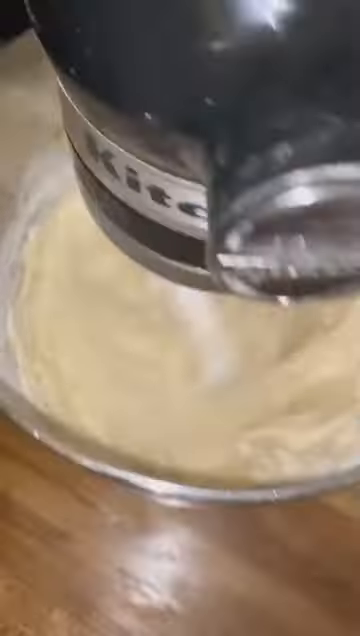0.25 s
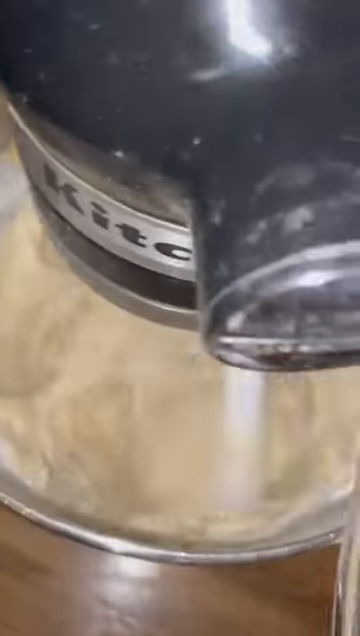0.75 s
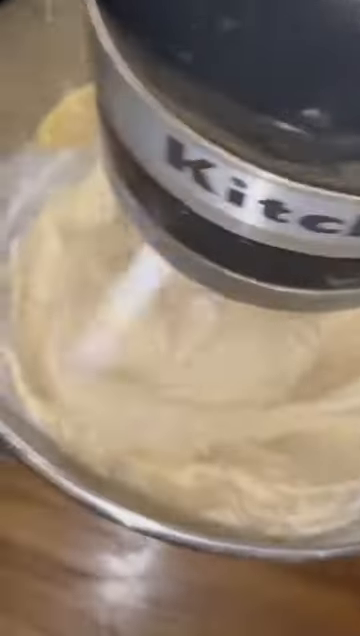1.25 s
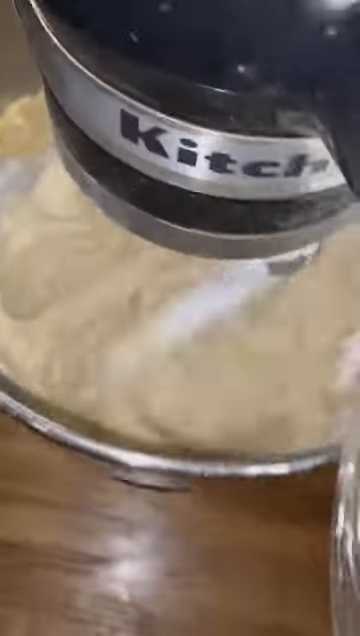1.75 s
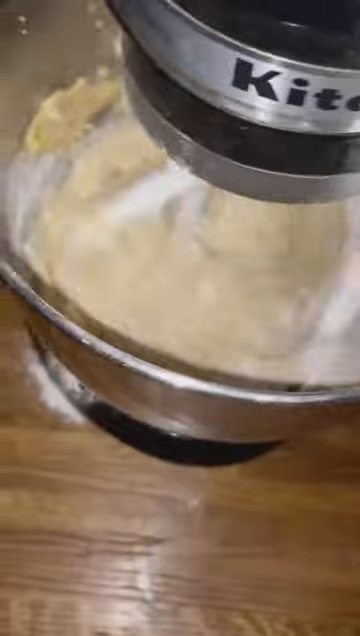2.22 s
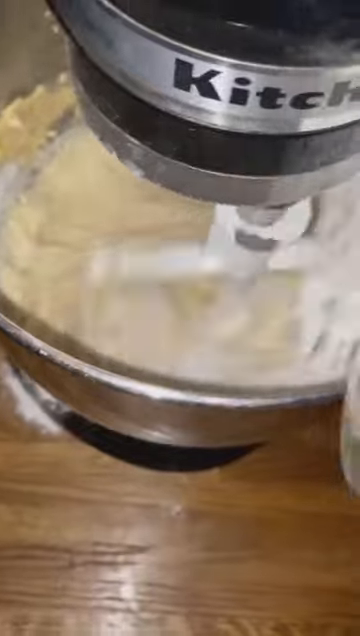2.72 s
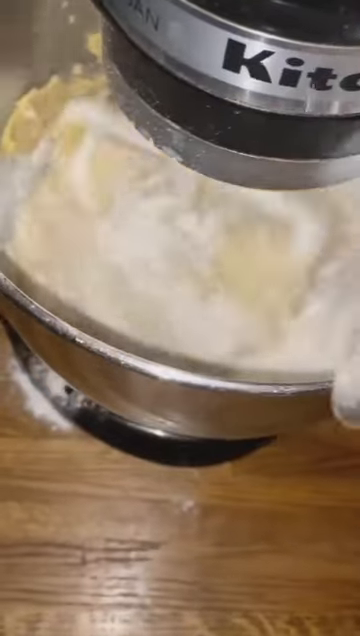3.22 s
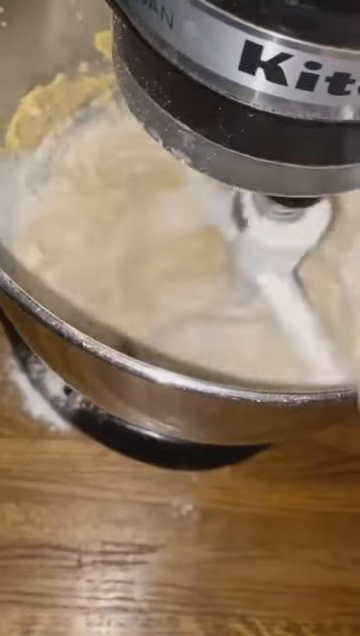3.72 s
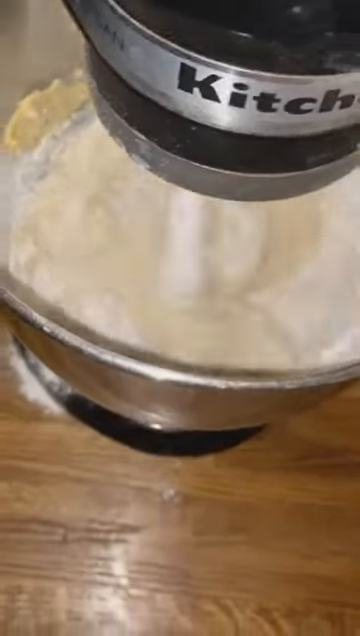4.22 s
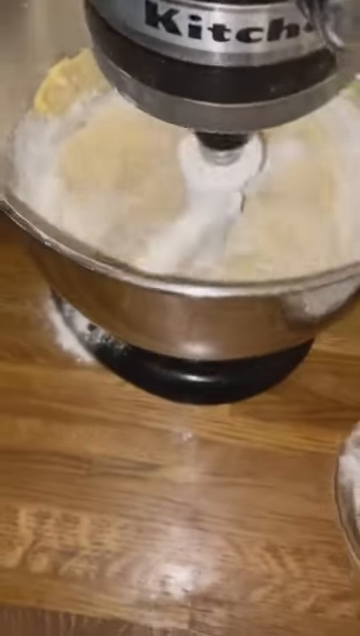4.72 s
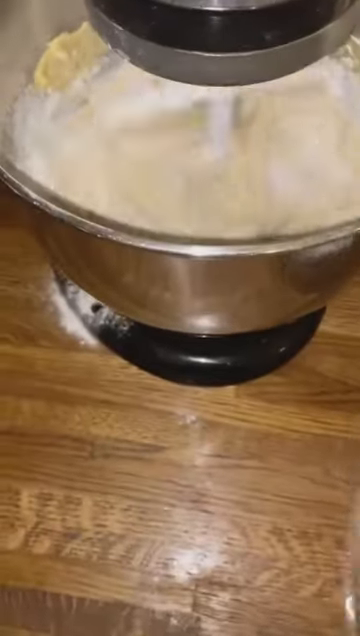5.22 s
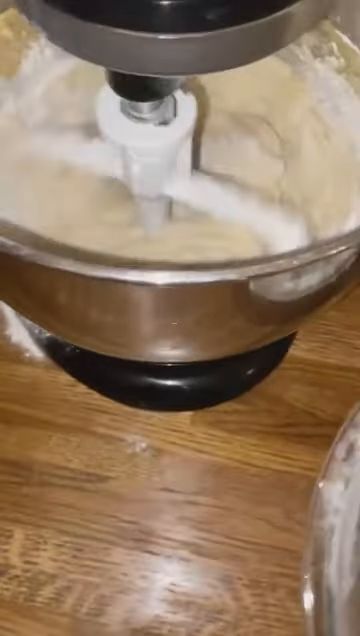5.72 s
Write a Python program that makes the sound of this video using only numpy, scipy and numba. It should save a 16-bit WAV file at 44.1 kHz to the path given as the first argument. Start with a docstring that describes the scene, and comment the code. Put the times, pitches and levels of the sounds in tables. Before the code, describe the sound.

A stand mixer works thick batter at a steady speed for about six seconds, recorded very close by phone in a lightly reverberant kitchen. The motor gives a buzzing hum with wavering whines, over a coarse whirr of gears and brushes with tiny random ticks. It grows louder during the first second as the phone leans in, then recedes after about 3.8 s. A low, soft counter bump falls at 0.66 s. From 1.47 to 3.6 s, about ten irregular taps of a dish on the steel rim clack loudly, with quick bounces, short damped rings and low thumps; they generally brighten as it empties, with one very faint tap near 3.47 s. The loudest blows briefly duck the motor. At 4.8 to 5.4 s the dish knocks on the wooden counter with falling chirps, rattle and a short low judder near 5.1 s. Faint sticky smacks occur throughout.

```python
"""A wooden counter in a kitchen: a stand mixer beats thick batter, the phone held just above the steel bowl.
The motor hums and whines in ladders of tones one torque pulse apart, over a noisy whirr of gears and
brushes, louder as the phone leans in. A dish of flour is tapped empty on the rim, ringing bowl and dish,
then set down and nudged along the counter, which answers with falling chirps and a low judder.
Sticky smacks and a faint room tail lie behind; the phone's limiter ducks around the loudest blows."""
import sys
import numpy as np
from scipy import signal
from scipy.fft import rfft, irfft
from scipy.io import wavfile
from scipy.ndimage import uniform_filter1d, minimum_filter1d
from numba import njit

SR = 44100
rng = np.random.default_rng(int(sys.argv[2]) if len(sys.argv) > 2 else 0)


def unload_audio(sound):
    """Save the sound as a 16-bit wav file, at the path given as the first command line argument."""
    columns = np.transpose(np.atleast_2d(sound))
    # keep every value between -1 and 1, then stretch to whole-number steps
    steps = np.round(np.clip(columns, -1, 1) * 32767)
    wavfile.write(sys.argv[1], SR, steps.astype(np.int16))


N = 262836
T, FREQ = np.arange(N) / SR, np.maximum(np.fft.rfftfreq(N, 1 / SR), 1)

# torque pulses (two a mains cycle), rotor turns, and the lowest lines of the growl, gear and whine ladders
PULSE_HZ, ROTOR_HZ = 119.9, 74.4
GROWL_HZ, GEAR_HZ, WHINE_HZ = 137.4, 821.7, 761.9
# dB lost per doubling of distance; the counter carries the lows, so they fall off less
HUM_FALL_DB, WHINE_FALL_DB, RUMBLE_FALL_DB, GEAR_FALL_DB, HISS_FALL_DB = 4, 5, 4, 5, 4.5


def undb(db):
    """Decibels to gain."""
    return 10 ** (np.asarray(db) / 20)


def over_hz(points):
    """Join (Hz, value) points on a log-frequency axis."""
    hz, value = np.transpose(points)
    return np.interp(np.log(FREQ), np.log(hz), value)


def filtered(x, gain):
    """Apply a frequency response."""
    return irfft(rfft(x) * gain, N)


def unit(x):
    """Scale to rms 1."""
    return x / np.sqrt(np.mean(x ** 2))


def walk(rate):
    """Smooth chance, changing about rate times a second, rms 1."""
    return unit(filtered(rng.standard_normal(N), np.exp(-(FREQ / rate) ** 2)))


def fade(t, t60):
    """Exponential decay, 60 dB down after t60 seconds."""
    return np.exp(-np.log(1000) * t / t60)


def resonance(hz, width_hz):
    """Resonant peak of gain 1 at hz, half as high at the edges of its width."""
    return 1 / (1 + (2 * (FREQ - hz) / width_hz) ** 2)


def add(track, s, sound):
    """Mix a sound into a track at time s."""
    start = int(s * SR)
    track[..., start:start + sound.shape[-1]] += sound[..., :N - start]


def motor(tone_db=-3.0, waver_db=1.57, drift_hz=1.0, flutter_db=1.5, own_db=1.65, own_drift_hz=0.53):
    """Ladders of hum and whine; the batter's drag makes each ladder waver, and each line a little on its own."""
    # Tone ladders, lines PULSE_HZ apart. Each row: lowest line in Hz, list of relative dB of each line upwards.
    ladders = [(PULSE_HZ, [-37.5, -42.5, -61, -54.5, -48]), (ROTOR_HZ, [-58, -39, -40.5, -51, -60]),
               (PULSE_HZ - ROTOR_HZ, [-52, -41.5, -75, -56.5]), (2 * ROTOR_HZ, [-40.5, -49.5]),
               (2 * (PULSE_HZ - ROTOR_HZ), [-70, -74, -43, -47.5]), (GROWL_HZ, [-41.5, -62, -44]),
               (GEAR_HZ, [-77, -43.5]), (WHINE_HZ, [-46, -60, -47, -46.5, -43, -56.5])]
    quarter_cycle = np.array([[0], [1 / 4]])  # the side is a quarter cycle ahead of the mid
    out = np.zeros((2, N))
    for lowest, line_dbs in ladders:
        near_db = nearness(HUM_FALL_DB if lowest < 2 * PULSE_HZ else WHINE_FALL_DB)
        # drift_hz is the rms drift of a ladder that starts at 500 Hz
        drift = drift_hz * np.sqrt(lowest / 500) * np.cumsum(walk(7.4)) / SR
        ladder_db = tone_db + near_db + waver_db * walk(2.0) + flutter_db * walk(39)
        strength = np.sqrt(2) * undb(ladder_db)
        for k, db in enumerate(line_dbs):
            wobble = walk(9.2)
            own_drift = own_drift_hz * np.cumsum(wobble) / SR
            cycles = (lowest + k * PULSE_HZ) * T + drift + own_drift + rng.random() + quarter_cycle
            out += undb(db + own_db * wobble) * strength * np.sin(2 * np.pi * cycles)
    return out


def nearness(fall_db, reference_m=0.3):
    """Level in dB of a part of the mixer as the phone moves nearer and farther."""
    # The phone leans in over the bowl, then draws back. Each row: time in seconds, distance to the motor in m.
    distance = [(0, 0.3), (.85, 0.21), (2.5, 0.22), (3.8, 0.26), (4.55, 0.38), (5.96, 0.34)]
    return -fall_db * np.log2(np.interp(T, *np.transpose(distance)) / reference_m)


def whirr(rumble_db=-36, gear_db=-39.0, hiss_db=-43, pulse_depth=0.025, beat_depth=0.21, rotor_depth=0.013,
          grain_db=2, churn_db=1.0, repeat=0.19, tick_rate=30, tick_db=3.0, tick_t60=0.028):
    """Gear teeth and brushes chatter in the housing, surging with torque pulse, rotor and the beat of both."""
    pulse = 2 * np.pi * PULSE_HZ * T
    rotor = 2 * np.pi * (ROTOR_HZ * T + np.cumsum(walk(4.1)) / SR / 2)
    pulsing = pulse_depth * (np.cos(pulse) + np.cos(3 * pulse) / 2)
    surge = pulsing + beat_depth * np.cos(pulse - rotor) + rotor_depth * np.cos(rotor)  # log gain
    # slack in the gears lets the teeth tick at random, about tick_rate times a second
    strikes = (rng.random(N) < tick_rate / SR) * rng.random(N)
    ticks = undb(tick_db) * filtered(strikes, rfft(fade(T, tick_t60)))
    chatter = rng.standard_normal((2, N)) * np.exp(surge) * undb(grain_db * walk(390))
    brushes = rng.standard_normal((2, N)) * np.exp(surge / 2)
    # three bands, crossing at 650 and 2450 Hz
    below_gears, below_hiss = 1 / (1 + (FREQ / 650) ** 6), 1 / (1 + (FREQ / 2450) ** 6)
    parts = [(chatter * (1 + ticks / 2), below_gears, rumble_db + nearness(RUMBLE_FALL_DB)),
             (chatter * (1 + ticks), below_hiss - below_gears, gear_db + nearness(GEAR_FALL_DB)),
             (brushes * (1 + ticks / 2), 1 - below_hiss, hiss_db + nearness(HISS_FALL_DB))]
    # the same teeth meet on every turn, so part of the chatter repeats
    turns = 1 / (1 - min(repeat, .9) * np.exp(-2j * np.pi * FREQ / ROTOR_HZ))
    out = 0
    for source, band, db in parts:
        out = out + unit(housing(source, band * turns)) * undb(db + churn_db * walk(21))
    return shifting(out)


def housing(x, band, stiff_s=3.4, stiffen_s=4.8):
    """The housing colours one band, its resonances shifting in strength as the flour stiffens the batter."""
    # Colour of the whirr. Each row: frequency in Hz, relative level in dB per Hz.
    whirr_colour = [(30, -33), (48, -49), (75, 3.5), (150, -1.5), (350, -2), (560, -10.5), (1300, -22.5),
                    (1520, -19.5), (2400, -15.5), (4000, -19.5), (5400, -21.5), (5900, -20), (7700, -23),
                    (8300, -26.5), (13000, -29), (16000, -35)]
    # Housing resonances. Each row: centre in Hz, width in Hz, dB in thin batter, dB in stiff batter.
    housing_modes = [(471, 52, 6, -12), (862, 274, 15, 18), (1258, 290, 14.5, 12.5), (1668, 86, 6, 1),
                     (1770, 46, 0, 7.5), (1914, 88, 4.5, 5.5), (1800, 1320, 7, 7.5), (2163, 79, 5.5, 5.5),
                     (2905, 340, 4, 6), (3960, 230, 1.5, 2)]
    hz, width_hz, thin_db, stiff_db = np.transpose(housing_modes)[:, :, None]
    peaks, colour_db = resonance(hz, width_hz), over_hz(whirr_colour)
    thin = filtered(x, band * undb(colour_db + np.sum(thin_db * peaks, axis=0)))
    stiff = filtered(x, band * undb(colour_db + np.sum(stiff_db * peaks, axis=0)))
    # the change takes stiffen_s and is half done at stiff_s
    return thin + (stiff - thin) * np.clip(.5 + (T - stiff_s) / stiffen_s, 0, 1)


def shifting(x, shift_db=1.03, shift_rate=1.3, count=14):
    """The colour drifts: each half octave from 150 Hz up swells and sinks on its own."""
    place = np.clip(2 * np.log2(FREQ / 150), 0, count - 1)
    spectrum = rfft(x)
    out = 0
    for k in range(count):
        band = irfft(spectrum * np.maximum(1 - abs(place - k), 0), N)
        out = out + band * undb(shift_db * walk(shift_rate))
    return out


def rim_taps(tap_db=-2, rim_db=2, crack_db=-9.5, contact_s=0.0067, tail_db=-10, tail_t60=0.085, spot_db=5.0,
             lag_s=0.002802, side_db=1.0, sharpness=6, rock_s=0.0079, attack_s=0.0034, lift_s=0.013,
             detune=0.0056, zing_db=-17, zing_lag_s=0.018, zing_hz=3000, count=3, bounce_s=0.0033,
             bounce_db=-3.6, half_empty_s=2.69, bright_per_s=0.32, bright_per_db=0.1527,
             clack_db=-1.5, clack_t60=0.038, dish_hz=3850, dish_octaves=0.17, dish_db_per_s=3.3):
    """Each tap bounces on the rim, ringing dish and batter-damped bowl anew; the mixer rocks on its base."""
    # Taps of the dish. Each row: start in seconds, level in dB, pitch of the clack in Hz (it depends on how the
    # dish is held), Hz favoured by the spot struck, dB of the rim's lowest ring, dB of the zing round the wall.
    taps = [(1.4662, 0, 1977, 2930, -3.5, 3.5), (1.6936, -5, 1906, 2830, -7, -8),
            (2.1087, -9, 1805, 1057, -4, 1), (2.271, 0, 1770, 1049, -26, -15),
            (2.487, -2, 1800, 2620, 5.5, -10), (2.6685, 0, 1823, 2530, 1, 7),
            (2.8652, -0.5, 1845, 3840, 10.5, 10), (3.2537, -3.5, 1770, 2130, -6, 9.5),
            (3.465, -22, 1800, 1700, 9.5, -6), (3.5996, -2.5, 1900, 2470, 0.5, 12)]
    # Modes of, in turn, the loaded bowl, the longer-ringing bare rim (lowest first), the dish's short high
    # pair and the mixer rocking on its base. Each row: frequency in Hz, relative level in dB, t60 in seconds.
    bowl = [(230, -6, 0.034), (303, -13, 0.13), (433, -16.5, 0.083), (618, -9.5, 0.06), (950, -9.5, 0.019),
            (1029, -4, 0.035), (2138, -9.5, 0.052), (2567, -8, 0.064), (2790, -11, 0.045),
            (2892, -1.5, 0.023), (3230, -21, 0.017), (3510, -12, 0.018), (4870, -19, 0.027),
            (5390, -21.5, 0.06), (6270, -24, 0.025)]
    rim_modes = [(1633, -9.5, 0.095), (2777, -23, 0.2), (4540, -26, 0.07)]
    dish = [(3830, -3.5, 0.022), (3945, -3, 0.02)]
    base = [(75.7, -9, 0.21), (108.5, -4, 0.083)]
    # Crack of the contact. Each row: frequency in Hz, relative level in dB per Hz.
    crack_colour = [(40, -27), (150, -5), (1200, -5), (1900, 0), (2800, 0), (3300, -2), (3900, -1),
                    (4200, -9), (5500, -8), (6500, -13), (8000, -10), (12000, -17), (16000, -27)]
    rings, cracks, zings, t = np.zeros((2, N)), np.zeros((2, N)), np.zeros((2, N)), T[:SR // 3]
    thump = sum(undb(db) * np.sin(2 * np.pi * f * t) * fade(t, ring_s) for f, db, ring_s in base)
    thump = thump * (1 - np.exp(-(t / rock_s) ** 2))  # the heavy mixer is slow to start rocking
    attack, touch = 1 - fade(t, attack_s), np.exp(-(t / contact_s) ** 2)
    contact = attack * (touch + undb(tail_db) * fade(t, tail_t60))
    lift = 1 - np.exp(-(t / lift_s) ** 2)  # the rim sings only as the dish lifts off it
    rim_hz, rim_mode_db, rim_t60 = np.transpose(rim_modes)
    for s, db, clack_hz, spot_hz, lowest_db, wall_db in taps:
        hz, mode_db, t60 = np.transpose([(clack_hz, clack_db, clack_t60)] + dish + bowl)
        # taps are brighter as the dish empties and when they are harder; tilt in dB per octave
        bright = bright_per_s * (s - half_empty_s) + bright_per_db * db
        # flour damps the dish's high ring, less as it empties
        emptying = dish_db_per_s * (s - half_empty_s) * favour(hz, dish_hz, octaves=dish_octaves)
        tilt = bright * np.log2(hz / 1000)
        mode_db = mode_db + tap_db + emptying + spot_db * favour(hz, spot_hz) + tilt
        rim = ringing(t, rim_hz, rim_db + rim_mode_db + lowest_db * (rim_hz == rim_hz[0]), rim_t60)
        add(rings, s, undb(db) * (lift * rim + thump))
        add(zings, s, undb(db + wall_db) * touch * rng.standard_normal((2, len(t))))
        for k in range(count):
            when = s + k * bounce_s * rng.uniform(0.65, 1.3)
            strength = undb(db + k * bounce_db)
            # the dish's pressure pulls each mode a little
            pressed_hz = hz * (1 + detune * rng.standard_normal(len(hz)))
            add(rings, when, strength * attack * ringing(t, pressed_hz, mode_db, t60))
            noise = rng.standard_normal((2, len(t)))
            add(cracks, when, strength * undb(sharpness * bright) * contact * noise)
    # the treble of the contact runs round the steel wall and returns as a falling zing
    zings = filtered(bending(zings, zing_lag_s), 1 / np.hypot(1, (zing_hz / FREQ) ** 2))
    contact_noise = undb(crack_db) * cracks + undb(zing_db) * zings
    blows = rings + filtered(contact_noise, unit(undb(over_hz(crack_colour))))
    # start earlier by half the 1 kHz travel time
    return np.roll(bending(blows, lag_s), -int(lag_s / 2 * SR), axis=1) * undb([[0], [side_db]])


def favour(hz, spot_hz, octaves=0.03):
    """How fully a blow on one spot excites a mode, 0-1."""
    return np.exp(-(np.log2(hz / spot_hz) / octaves) ** 2)


def ringing(t, hz, db, t60):
    """Struck modes as mid and side, heard a quarter cycle apart."""
    cycles = hz * t[:, None] + rng.random(len(hz))
    z = undb(db) * np.exp(2j * np.pi * cycles) * fade(t[:, None], t60)
    return np.array([z.imag.sum(axis=1), z.real.sum(axis=1)])


def bending(x, lag_s):
    """Bending waves carry highs faster than lows; lag_s is the travel time at 1 kHz."""
    return filtered(x, np.exp(-4j * np.pi * lag_s * np.sqrt(1000 * FREQ)))


def counter_knocks(push_db=21, ring_db=1, rattle_t60=0.14, rebound_s=.0075, lag_s=0.0045, low_hz=72,
                   spot_db=7, side_db=2):
    """A push and a rebound travel through the wooden top as a falling chirp and leave it ringing."""
    # Knocks on the counter. Each row: start in seconds, level in dB, Hz above which the contact is dull,
    # steepness of that fall (exponent), rebound in dB, Hz favoured by the spot struck, rattle in dB.
    knocks = [(0.658, -8, 98, 4.1, 8, 88, 4), (4.8114, 6.5, 674, 4.1, 5, 483, 1),
              (4.94, -9, 220, 2.9, -3, 106, 5), (5.232, -20, 945, 7.4, -2, 780, 9),
              (5.2414, 4, 990, 5.8, 3.5, 350.6, 0), (5.3660, -1, 820, 7.6, 3, 630, -6)]
    # Modes of the counter. Each row: frequency in Hz, relative level in dB, t60 in seconds.
    counter = [(88, -13, 0.15), (114, -12.5, 0.094), (344.5, -7.5, 0.064), (473, -14, 0.054),
               (630, -8.5, 0.013), (764, -11, 0.074), (900, -12, 0.037), (1140, -7, 0.047),
               (4320, -3, 0.069)]
    out, t = 0, T[:SR // 2]
    for s, db, dull_hz, slope, rebound_db, spot_hz, rattle_db in knocks:
        wood = 0
        for hz, mode_db, t60 in counter:
            level = undb(ring_db + mode_db + spot_db * favour(hz, spot_hz))
            wood = wood + level * np.cos(2 * np.pi * hz * t) * fade(t, t60)
        # the dish rattles on its foot as it settles
        blow = wood + undb(rattle_db) * fade(t, rattle_t60) * rng.standard_normal((2, len(t)))
        blow[:, 0] += undb(push_db)
        blow[:, int(rebound_s * SR)] += undb(push_db + rebound_db)
        track = np.zeros((2, N))
        add(track, s, undb(db) * blow)
        dull = 1 / np.sqrt(1 + (FREQ / dull_hz) ** slope)
        out = out + filtered(track, dull / np.sqrt(1 + (low_hz / FREQ) ** 8))
    # the side hears the wood a quarter cycle apart from the mid
    out = filtered(bending(out, lag_s), np.array([[1], [1j * undb(side_db)]]))
    return np.roll(out, -int(lag_s / 3 * SR), axis=1)


def dish_slide(loudest_s=5.113, half_s=0.032):
    """The dish's foot sticks and slips as it is nudged along the wood: noise in a short low judder."""
    # Resonances of the judder. Each row: centre in Hz, width in Hz, level in dB.
    slide = [(122, 30, -22), (340, 200, -32)]
    friction = rng.standard_normal((2, N))
    judder = sum(undb(db) * unit(filtered(friction, resonance(hz, width_hz))) for hz, width_hz, db in slide)
    return judder * np.exp(-((T - loudest_s) / half_s) ** 2)


def batter_clicks(width_hz=900, t60=0.043):
    """Batter parts from the beater with a tiny smack, a decaying burst of noise round one pitch."""
    # Sticky smacks. Each row: start in seconds, level in dB, centre in Hz.
    clicks = [(0.179, -33, 4660), (1.131, -36.5, 4170), (3.743, -27, 930), (4.3175, -34, 4520),
              (4.641, -38, 4730), (5.5987, -34, 4600)]
    out, t = np.zeros((2, N)), T[:SR // 10]
    for s, db, hz in clicks:
        smack = np.zeros((2, N))
        add(smack, s, undb(db) * fade(t, t60) * rng.standard_normal((2, len(t))))
        out += filtered(smack, unit(resonance(hz, width_hz)))
    return out


def kitchen(x, wet_db=-19, t60=0.29):
    """A faint, short, dull room tail of decaying noise, fed by the mid."""
    tail = rng.standard_normal((2, N)) * fade(T, t60) * (T > .008)
    dull = 1 / np.hypot(1, (FREQ / 2300) ** 2)
    return x + undb(wet_db) * filtered(x[0], dull * rfft(unit(tail)) / np.sqrt(N))


def scene():
    """All sources as mid and side, spread to left and right."""
    # Stereo width. Each row: frequency in Hz, gain of side over mid in dB.
    side_gain = [(60, -24), (200, -30), (400, -12), (820, 3), (1250, -11), (1900, -24), (2800, -1),
                 (4000, -6), (5700, -4), (6600, -35), (7800, -46), (8100, -4), (9400, -11.5), (10500, 0),
                 (13000, -12), (15000, -19)]
    mid, side = kitchen(motor() + whirr() + rim_taps() + counter_knocks() + dish_slide() + batter_clicks())
    width = undb(over_hz(side_gain))
    mid, side = filtered(mid, 1 / np.hypot(1, width)), filtered(side, width / np.hypot(1, width))
    return np.array([mid + side, mid - side])


@njit
def peak_hold(x, keep):
    """Follow peaks at once and let go slowly."""
    out, held = np.empty(len(x)), 0.
    for i in range(len(x)):
        held = max(x[i], held * keep)
        out[i] = held
    return out


def record(dry, release_s=0.24, ceiling=.97, top_hz=15900):
    """Left and right are set apart in level and phase; a look-ahead limiter ducks loud blows; the top is cut."""
    # Level balance of left against right. Each row: frequency in Hz, gain of left over right in dB.
    balance = [(60, 0), (200, -2.5), (700, -5), (1200, 0.5), (2000, -0.5), (4000, -0.5), (15000, 1)]
    # Phase of left against right. Each row: frequency in Hz, lead given to the left in radians.
    left_lead = [(2300, 0), (3000, .8), (5400, .2), (5900, .6), (6600, 3.1), (7800, 3.14), (8000, .3),
                 (13000, .4), (14300, 3.1)]
    lean = undb(over_hz(balance) / 2) * np.exp(.5j * over_hz(left_lead))
    pair = filtered(dry, np.array([lean, 1 / lean]))
    peak = peak_hold(np.abs(pair).max(axis=0), np.exp(-1 / (release_s * SR)))
    gain = np.minimum(1, ceiling / (peak + 1e-9))
    gain = uniform_filter1d(minimum_filter1d(gain, size=65), size=65)  # ducks just ahead of the peak
    return signal.sosfilt(signal.ellip(8, .2, 70, top_hz, fs=SR, output="sos"), pair * gain)


dry = scene()
out = record(dry)
unload_audio(out)
```